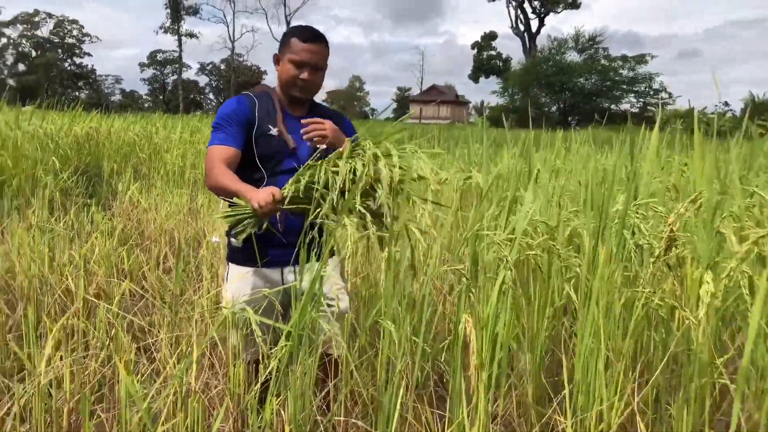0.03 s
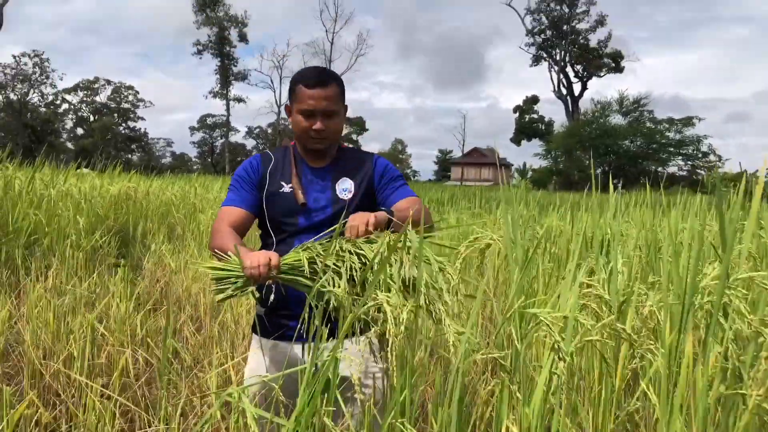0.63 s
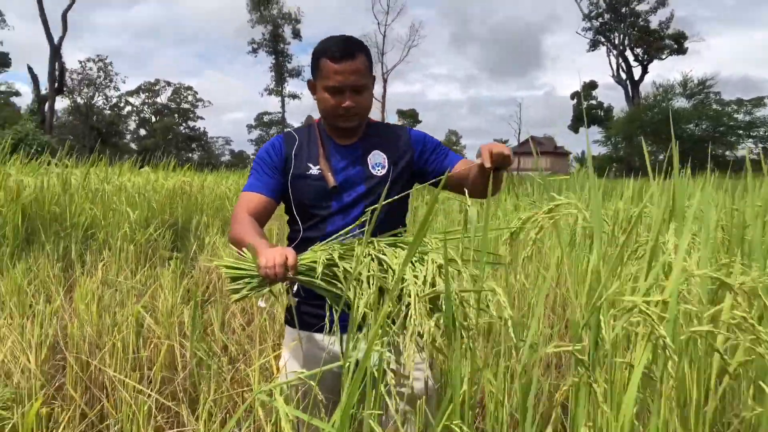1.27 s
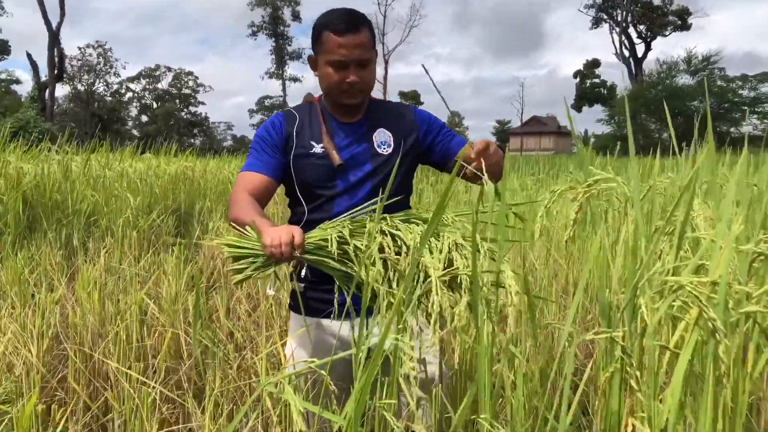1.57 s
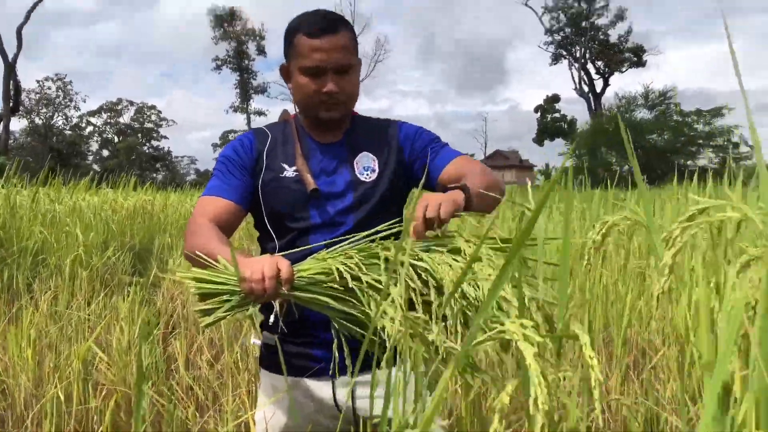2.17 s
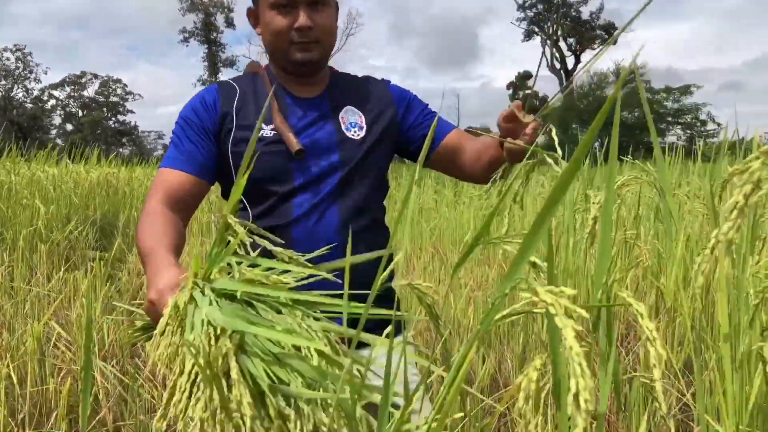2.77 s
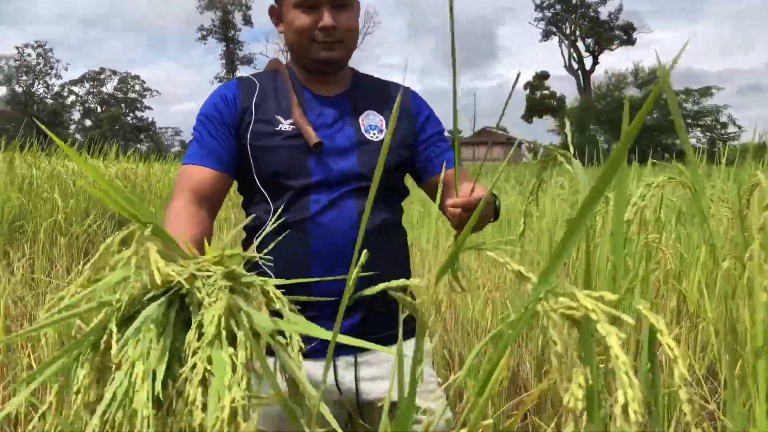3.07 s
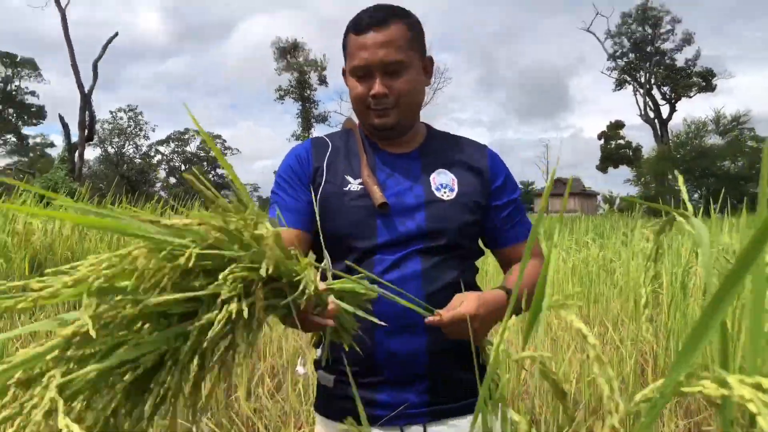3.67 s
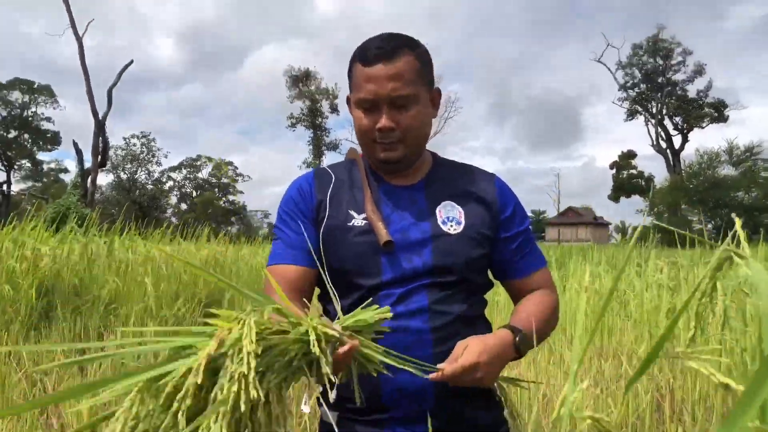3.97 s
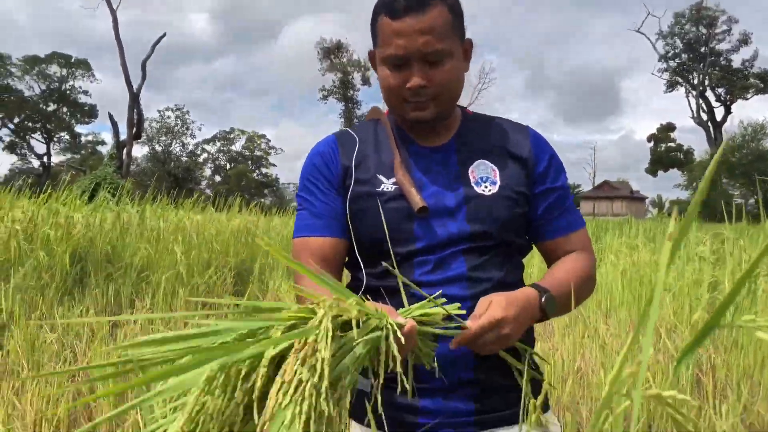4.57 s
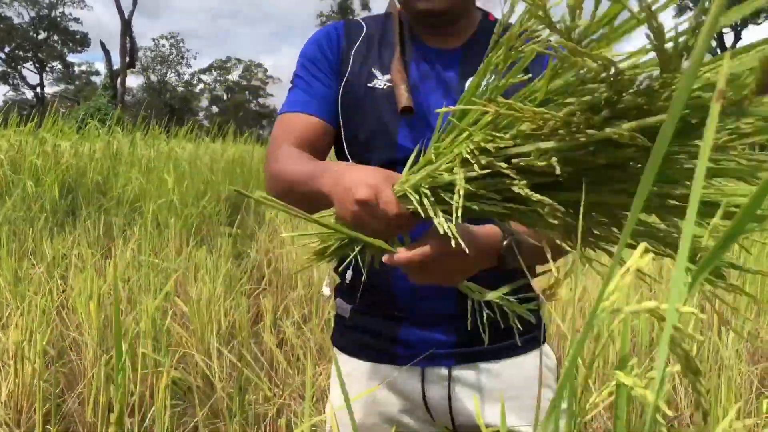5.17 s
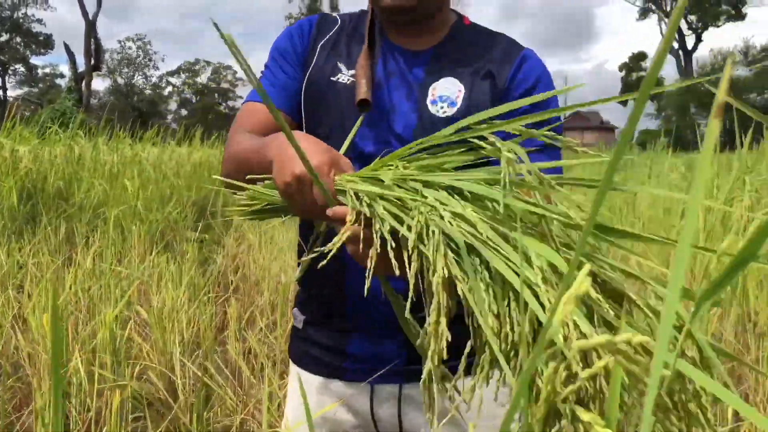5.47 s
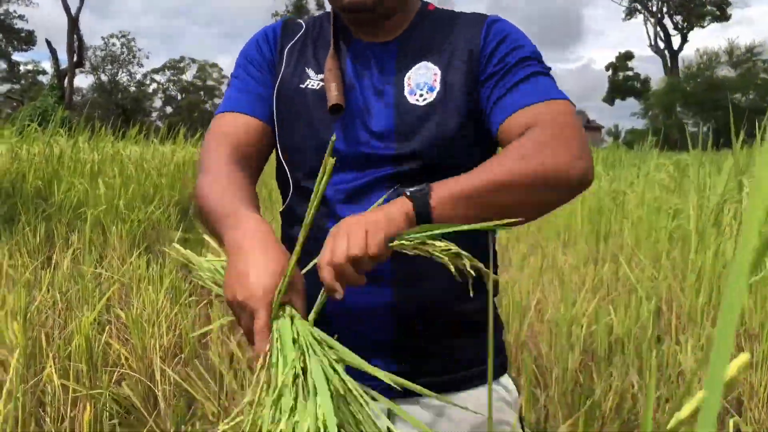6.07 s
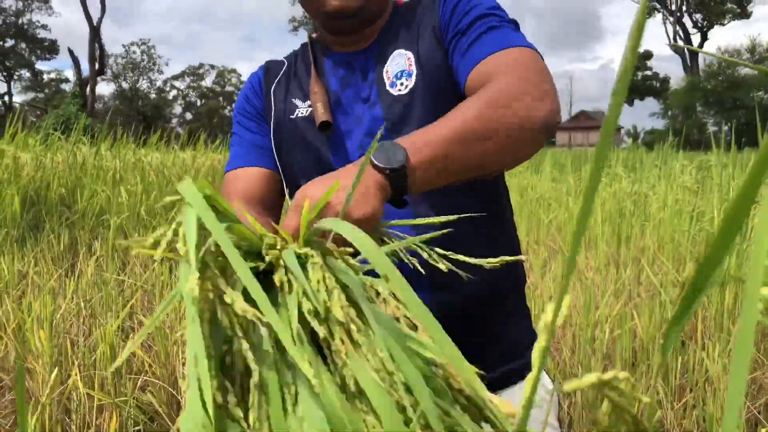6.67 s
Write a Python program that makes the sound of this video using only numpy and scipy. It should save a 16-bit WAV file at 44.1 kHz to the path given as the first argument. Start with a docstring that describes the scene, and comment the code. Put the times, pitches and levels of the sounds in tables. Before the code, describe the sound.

A bundle of rice stalks rustles and crackles in someone's hands, with soft muddy steps and a distant diesel engine thudding.

```python
"""A bundle of ripe rice rustles in someone's hands in an open paddy, a step or two from one microphone.
At first slow steps squelch in the mud, while far off a one-cylinder diesel thuds over faint field air.
From about 2 s the engine slows; dry blades slide, seed heads shake and hiss, and a few stems tick.
The squelching ends before 4 s, and by 5 s the engine is idling.
Then the bundle is turned more briskly, the engine picks up again, and one last step lands."""
import sys
import numpy as np
from scipy import signal
from scipy.fft import rfft, irfft
from scipy.io import wavfile
from scipy.ndimage import uniform_filter1d

SR = 44100
rng = np.random.default_rng(int(sys.argv[2]) if len(sys.argv) > 2 else 0)


def unload_wav(signal):
    """Save mono or channel-first audio to the path in sys.argv[1] as 16-bit WAV at rate SR, clipped to [-1, 1]."""
    wavfile.write(
        sys.argv[1],
        SR,
        np.round(np.clip(np.atleast_2d(signal).T, -1, 1) * 32767).astype(np.int16),
    )


N = 304731
TIME = np.arange(N) / SR
TOP_HZ = 15950  # the treble is cut off above this


# How briskly the bundle is turned, as the loudness of its blades: t/s, level/dB
TURNING = [(0, -66.5), (.42, -70.5), (.8, -69), (1.2, -65), (1.36, -69), (2.08, -67.5), (2.5, -63),
           (2.75, -60.5), (3.5, -60.5), (4.18, -63), (4.26, -68.5), (4.37, -65.5), (4.71, -68), (4.75, -64),
           (4.93, -60.5), (5.01, -64), (5.11, -58.5), (5.24, -53), (5.61, -56), (5.67, -58), (5.76, -55),
           (6.3, -53), (6.46, -56.5), (6.58, -51), (6.9, -54)]
# Single strokes and shakes: t/s, length/s, blade level/dB, extra for the seed heads/dB
STROKES = [(0.497, 0.11, -62.5, 7), (0.866, 0.16, -71.5, 15.5), (1.215, 0.08, -68, -4),
           (1.525, 0.21, -63.5, 9), (1.885, 0.18, -71.5, 13), (2.123, 0.17, -61.5, 5),
           (2.255, 0.087, -58, 7), (2.313, 0.11, -71, 14), (3.24, 0.27, -67, 11.5),
           (3.52, 0.46, -74.5, 14.5), (4.05, 0.09, -66, 6), (4.422, 0.067, -76, 20.5), (4.5, 0.28, -78, 15),
           (4.72, 0.048, -72, 14), (4.885, 0.16, -68, 10), (5.186, .17, -59.5, 10), (5.467, 0.09, -62, 4),
           (5.562, 0.08, -53.5, 5), (5.777, 0.075, -54, -10), (5.957, 0.25, -57.5, 11),
           (6.344, 0.065, -61, 11), (6.533, 0.56, -52.5, 8), (6.66, 0.4, -55, -1)]
def handling(husk_extra_db=5.5):
    """Starting levels in dB for blades and seed heads: strokes swell and fade on top of the turning."""
    blade_power = undb(curves(TURNING)[0]) ** 2
    husk_power = blade_power * undb(husk_extra_db) ** 2
    for s, length_s, db, extra_db in STROKES:
        progress = np.clip((TIME - s) / length_s, 0, 1)
        stroke = undb(db) * abs(np.sin(np.pi * progress)) ** .7
        blade_power += stroke ** 2
        husk_power += (stroke * undb(extra_db)) ** 2
    return 10 * np.log10(blade_power), 10 * np.log10(husk_power)


# The tone of thick stalks rubbing inside the bundle: f/Hz, level/dB
STALK_TONE = [(250, -22), (550, -1.5), (1000, -3.5), (1600, -4), (2400, -6.5), (4500, -6.5), (9000, -41)]
# The tone of dry blades sliding: f/Hz, level/dB
BLADE_TONE = [(300, -18), (600, -28.5), (1100, -7), (2200, -3.5), (3600, -2), (5500, -3), (8000, -4.5),
              (11000, -7.5), (16000, -19.5)]
# The high hiss of husks in the seed heads: f/Hz, level/dB
HUSK_TONE = [(5000, -20.5), (8500, -8.5), (10500, -3), (12500, 1.5), (14500, 5.5), (15600, 9), (16500, -30)]
def rustle(stalk_gain_db=-10.5, husk_gain_db=-1):
    """Rough blades and stalks catch and slip, hard husks tap together; brisker hands make more taps."""
    blade_db, husk_db = handling()
    briskness = undb(blade_db - blade_db.max())
    slips = undb(.5 * wander(80))
    stalks = colour(contacts(1500 + 5000 * briskness, spread_db=3), STALK_TONE)
    blade_taps = contacts(4000 + 14000 * briskness, spread_db=1.5)
    blades = colour(shimmer(blade_taps, depth_db=2.5, per_s=40, bands=36), BLADE_TONE)
    husk_taps = contacts(6000 + 14000 * briskness, spread_db=2)
    husks = colour(shimmer(husk_taps, depth_db=1, per_s=96, bands=14), HUSK_TONE)
    leaves = (unit(blades) + unit(stalks) * undb(stalk_gain_db)) * undb(blade_db)
    return slips * leaves + unit(husks) * undb(husk_db + husk_gain_db + wander(90))


def crinkle(centre_hz=3400, octaves=.58, spread_db=3, gain_db=-12, count=1800):
    """Single blades flick free and ring for a moment, each at its own pitch."""
    out = np.zeros(N)
    for s, (pitch, size) in zip(rng.uniform(0, N / SR, count), scatter(count, 2)):
        hz = centre_hz * 2 ** (octaves * pitch)
        add(out, s, undb(spread_db * size) * np.sqrt(hz) * ping(hz, cycles=20, glide=0))
    blade_db, _ = handling()
    return unit(out) * undb(blade_db + gain_db)


# Single leaves dragged over the stems: t/s, length/s, level/dB, start f/Hz, end f/Hz
SCRAPES = [(1.246, 0.016, -65, 5400, 5700), (1.486, 0.026, -58, 3400, 3690), (1.58, 0.023, -60, 3130, 2800),
           (3.063, 0.03, -66, 3900, 3600), (5.225, .11, -65, 1300, 1100), (5.429, 0.12, -59, 4280, 4710),
           (5.565, 0.054, -62, 4500, 4210), (6.342, 0.028, -55.5, 5270, 5830),
           (6.354, .055, -56.5, 3500, 3200), (6.791, 0.048, -60, 1193, 1393)]
def leaf_scrapes(slips_per_s=2500, sharpness=2.1):
    """A toothed leaf edge slips over a stem and rings; its pitch moves as its free length changes."""
    out, t = np.zeros(N), TIME[:SR // 3]
    for s, length_s, db, start_hz, end_hz in SCRAPES:
        slips = (rng.random(SR) < slips_per_s / SR) * rng.standard_normal(SR)
        width_hz = start_hz / sharpness
        ring = resonate(resonate(slips, start_hz, width_hz), start_hz, width_hz)
        speed = np.interp(t, [0, length_s], [1, end_hz / start_hz])  # faster sounds higher
        scrape = unit(np.interp(np.cumsum(speed), np.arange(SR), ring))
        add(out, s, scrape * swell(t, length_s, attack_s=.0056, release_s=.013) * undb(db))
    return out


# Stems that crack as they kink, and hard husks that tick high in the treble: t/s, peak level/dB, f/Hz
CRACKS_AND_TICKS = [(.248, -49, 2200), (.495, -52, 1800), (1.013, -51, 2600), (1.178, -48.5, 1700),
                    (1.502, -46, 3500), (1.546, -46.5, 2400), (1.598, -44, 2700), (1.678, -46, 4000),
                    (1.936, -46, 7000), (2.748, -48, 2500), (2.795, -48, 2500), (2.89, -45, 2540),
                    (3.037, -43, 2100), (3.074, -43, 2830), (3.092, -44.5, 3200), (3.175, -46, 2400),
                    (3.196, -46, 2000), (3.326, -43, 2600), (3.384, -45.5, 2100), (3.392, -41, 1700),
                    (3.394, -43.5, 3700), (4.6349, -38, 14800), (4.7995, -36, 14500), (5.9284, -37, 13000),
                    (6.037, -37, 9000), (6.104, -36, 11000), (6.3579, -38, 5500), (6.441, -39, 8000),
                    (6.5645, -33, 12000), (6.7166, -26.5, 8000), (6.7645, -31, 12000), (6.836, -34, 8000)]
def cracks_and_ticks(decay_s=.0006):
    """A kinking stem gives one short, fairly low crack; a husk gives a tick high in the treble."""
    out, t = np.zeros(N), TIME[:512]
    for s, db, hz in CRACKS_AND_TICKS:
        width_hz = min(hz / 1.4, 6000)
        crack = resonate(resonate(burst(t, decay_s), hz, width_hz), hz, width_hz)
        add(out, s, at_peak(crack, db))
    return out


# Feet settling on soft ground: t/s, peak level/dB
FOOTFALLS = [(1.197, -57), (1.669, -59), (3.401, -47), (6.795, -52)]
def footfalls(decay_s=.0061):
    """A foot sinking in gives a short, dull thump."""
    out, t = np.zeros(N), TIME[:4096]
    ground = knock([(100, -41), (200, -.5), (290, 18), (450, -10), (800, -8.5), (2000, -29)])
    for s, db in FOOTFALLS:
        thump = signal.fftconvolve(burst(t, decay_s), ground)
        add(out, s, at_peak(thump, db))
    return out


# The biggest air pockets in the mud: t/s, level before gain/dB, f/Hz, ring time/cycles
AIR_POCKETS = [(.246, -51, 2580, 4), (.427, -55, 350, 1), (.615, -51.5, 480, 1.2), (.968, -54, 1360, 3),
               (1.093, -52.5, 700, 2.2), (1.105, -45.5, 428, 9.4), (1.161, -41.5, 473, 3),
               (1.193, -42.5, 370, 2.8), (1.208, -46, 590, 2.5), (1.227, -45.5, 1010, 4.5),
               (1.251, -46, 1700, 5.5), (1.271, -43, 1170, 3), (1.308, -44, 784, 2.3),
               (1.335, -44.5, 3020, 7), (1.349, -41, 1120, 4.7), (1.388, -49, 960, 2.8),
               (1.399, -45, 1190, 2.4), (1.539, -51, 1460, 2.8), (1.619, -48.5, 1570, 3),
               (1.663, -49, 494, 2), (1.671, -50.5, 530, 1.4), (1.701, -56, 1630, 2.7),
               (1.748, -50, 1610, 1.6), (2.661, -52.5, 567, 2.7), (3.071, -54, 995, 3.3),
               (3.118, -47, 2400, 4), (3.126, -52, 1350, 4), (3.28, -51.5, 930, 4.8),
               (3.343, -49.5, 1620, 8), (3.36, -54, 1150, 4), (3.393, -51.5, 680, 2.2),
               (3.402, -48, 373, 1.2), (3.415, -43, 2830, 4.2), (3.459, -54.5, 904, 9.8),
               (3.492, -54.5, 850, 6), (3.538, -43.5, 860, 0.93)]
def mud_pops(splat_gain_db=-5.5, ring_gain_db=-1, ring_delay_s=.001116):
    """Each air pocket bursts with a wet splat and rings briefly."""
    out, t = np.zeros(N), TIME[:2048]
    for s, db, hz, cycles in AIR_POCKETS:
        splat = resonate(burst(t, decay_s=6.3 * cycles / hz), 1.15 * hz, width_hz=.75 * hz)
        add(out, s, at_peak(splat, db + splat_gain_db))
        add(out, s + ring_delay_s, undb(db + ring_gain_db) * ping(hz, cycles, glide=.0079))
    return out


# Mud sucking at a foot: t/s, length/s, level before gain/dB, start f/Hz, end f/Hz, spread/octaves
SQUELCHES = [(0.243, 0.031, -68.5, 1500, 1300, 0.18), (0.489, 0.08, -63, 570, 670, 0.12),
             (0.504, 0.054, -67, 1700, 1350, 0.26), (1, 0.16, -64, 850, 470, 0.47),
             (1.147, 0.11, -59.5, 496, 704, 0.35), (1.192, 0.046, -56, 1010, 1330, 0.45),
             (1.299, 0.2, -63, 1160, 1520, 0.65), (1.49, 0.17, -64, 2000, 1700, 0.58),
             (1.653, 0.16, -71, 1310, 1120, 0.61), (3.043, 0.056, -64, 1580, 1640, 0.62),
             (3.248, 0.14, -65.5, 1820, 1430, 0.6), (3.445, 0.16, -72, 850, 880, 0.53)]
def mud_suction(bubbles_per_s=700, spread_db=3, gain_db=.5):
    """A crowd of small bubbles around the foot slides in pitch as it sinks or pulls free."""
    out, t = np.zeros(N), TIME[:SR // 2]
    for s, length_s, db, start_hz, end_hz, octaves in SQUELCHES:
        crowd = np.zeros(SR)
        for k, (late, pitch, size, sign) in enumerate(scatter(bubbles_per_s // 2, 4)):
            when = (k + late + 2) / bubbles_per_s
            hz = np.interp(when, [0, length_s], [start_hz, end_hz]) * 2 ** (octaves * pitch)
            strength = np.sign(sign) * undb(spread_db * size) * np.sqrt(hz)
            add(crowd, when, strength * ping(hz, cycles=3.3, glide=.027))
        fade = swell(t, length_s, attack_s=.017, release_s=.026)
        add(out, s, unit(crowd[:len(t)]) * fade * undb(db + gain_db))
    return out


# How often the engine fires: t/s, f/Hz
ENGINE_SPEED = [(0.0, 28.77), (1.7, 28.79), (2.0, 26.46), (2.5, 27.33), (3.0, 25.93), (3.6, 24.25),
                (4.2, 21.8), (5.0, 19.5), (5.45, 18.44), (5.8, 19.61), (6.3, 22.18), (6.91, 26.28)]
# How much of each thud carries across the field: t/s, fullness/0-1
CARRY = [(0, 0.56), (.55, 0.98), (.85, 0.92), (1.2, 0.08), (1.83, 0.04), (2.0, 1), (3.0, 1), (5.9, 0.77),
         (6.91, 0.36)]
# The tone of a full thud at top speed: f/Hz, level/dB
FULL_THUD = [(28, -32.5), (45, -37.5), (58, -2), (86, -15.5), (115, 5), (144, 1.5), (172, 0), (200, -10.5),
             (230, -19.5), (290, -11.5), (350, -21), (500, -34), (900, -57.5)]
# The same thud thinned to mostly the pipe's note: f/Hz, level/dB
THIN_THUD = [(28, -32), (58, -12), (86, -28), (115, -11.5), (144, -3), (172, 2), (200, -6.5), (230, -28),
             (280, -13.5), (380, -29.5), (900, -51.5)]
# The boom of the slowing engine, before its pitch is lowered: f/Hz, level/dB
SLOWING_BOOM = [(30, -30), (50, -38), (76, 23), (100, 9), (140, 8), (400, -44)]
# The tone of the low rush of exhaust gas: f/Hz, level/dB
GAS_RUSH_TONE = [(120, -54), (210, -3.5), (290, -2), (380, -10), (600, -20.5), (1500, -25), (5000, -68)]
def diesel(jitter_s=.0014, spread_db=4, cooling=.52, boom_db=-6.5, gas_rush_db=-12, gain_db=-3):
    """Each firing thuds in the exhaust pipe; distance leaves the bass, at times only the pipe's note."""
    rate, = curves(ENGINE_SPEED)
    fullness, = curves(CARRY)
    level_db, uneven = engine_state()
    full, thin, boom = knock(FULL_THUD), knock(THIN_THUD), knock(SLOWING_BOOM)
    cycles = np.cumsum(rate) / SR
    firings = np.flatnonzero(np.diff(np.floor(cycles), prepend=-1))
    slowing = uniform_filter1d(1. * (np.gradient(rate) < 0), SR)
    thuds, age = np.zeros(N), np.arange(len(full))
    for i, (late, size) in zip(firings, scatter(256, 2)):
        thud = thin + fullness[i] * (full - thin)
        # off the throttle the firings boom and stumble
        thud += undb(boom_db) * slowing[i] * np.sqrt(uneven[i]) * boom
        when = i / SR + jitter_s * uneven[i] * late
        # cooler gas at low speed makes the pipe ring lower
        thud = np.interp(age * (rate[i] / rate.max()) ** cooling, age, thud)
        add(thuds, when, undb(spread_db * uneven[i] * size) * thud)
    # a nearly steady low rush of exhaust gas when the engine works hard
    gas_rush = unit(colour(rng.standard_normal(N), GAS_RUSH_TONE) * np.exp(-(cycles % 1) / 4.5))
    effort = np.clip(1 - 2 * uneven, 0, 1)
    exhaust = thuds * np.sqrt(SR / rate) + gas_rush * effort * fullness * undb(gas_rush_db)
    return exhaust * undb(level_db + gain_db)


# The throttle, which sets how hard the engine works: t/s, opening/0-1
THROTTLE = [(0, 1), (1.72, 0.71), (2.0, 0.54), (2.11, 0.45), (2.16, 0.65), (2.28, 0.8), (2.35, 0.4),
            (2.42, 0.66), (2.52, 0.66), (2.6, 0.53), (3.0, 0.47), (3.55, 0.59), (3.95, 0.32), (4.5, 0.06),
            (5.0, 0.08), (5.45, 0.24), (5.95, 0.81), (6.91, 1)]
def engine_state(open_db=-49.5, shut_db=-69.5, db_per_octave=9, stumble=.59):
    """Starting level in dB and unevenness: a closing throttle makes the firings weak and ragged."""
    shut = 1 - np.clip(curves(THROTTLE)[0], 0, 1)
    rate, = curves(ENGINE_SPEED)
    throttle_db = open_db + (shut_db - open_db) * shut ** 1.7
    speed_db = db_per_octave * np.log2(rate / rate.max())  # slower firings are weaker too
    return throttle_db + speed_db, stumble * shut


# The tone of the engine's echo: f/Hz, level/dB
ECHO_TONE = [(35, -18), (55, -28), (80, -4), (120, -18), (165, -6), (230, -36), (600, -61)]
def far_rumble(gain_db=-14.5):
    """The tree line sends the diesel back as a blurred rumble that stands out more when it stumbles."""
    level_db, uneven = engine_state()
    rumble = unit(colour(rng.standard_normal(N), ECHO_TONE))
    return rumble * (.5 + 2 * uneven) * undb(level_db + gain_db)


# The tone of the open air: f/Hz, level/dB
AIR_TONE = [(22, 5), (38, -24), (55, 1), (90, 2.5), (165, 2), (215, -6.5), (400, -11.5), (700, -18),
            (1300, -16.5), (2500, -24), (6000, -28), (16000, -71)]
def field_air(level_db=-61):
    """A soft, almost steady wash from far across the field."""
    return unit(colour(rng.standard_normal(N), AIR_TONE)) * undb(level_db + .13 * wander(1))


def contacts(per_s, spread_db):
    """Tiny taps at random moments, most of them weak; equally strong overall at any rate."""
    chance = np.clip(per_s / SR, 1e-4, 1)
    size = undb(spread_db * np.minimum(rng.exponential(size=N), 5))
    hits = rng.random(N) < chance
    return unit(hits * size * rng.choice([-1, 1], N) / np.sqrt(chance))


def shimmer(x, depth_db, per_s, bands):
    """Each touching blade rings in its own pitch range, so each range swells and fades on its own."""
    spectrum = rfft(x)
    place = np.sqrt(np.minimum(np.fft.rfftfreq(N, 1 / SR) / TOP_HZ, 1)) * (bands - 1)
    slices = (irfft(spectrum * np.maximum(1 - abs(place - k), 0), N) for k in range(bands))
    return sum(band * undb(depth_db * wander(per_s)) for band in slices)


def ping(hz, cycles, glide):
    """A short, fading ring; with a glide its pitch rises like a bubble's."""
    turns = np.arange(int(5 * cycles * SR / hz)) * hz / SR
    fade = (1 - np.exp(-2 * turns)) * np.exp(-turns / cycles)
    return fade / fade.max() * np.sin(2 * np.pi * turns * (1 + glide * turns / cycles))


def knock(tone, size=4096):
    """The ring of one blow, with its tone given as rows of f/Hz, level/dB."""
    cepstrum = irfft(np.log(tone_gains(tone, size)))
    # keeping only the first half packs the sound toward its start (minimum phase)
    ring = irfft(np.exp(rfft(2 * cepstrum * (np.arange(size) < size // 2))))
    return ring / np.linalg.norm(ring)


def tone_gains(tone, size):
    """Join rows of f/Hz, level/dB into a gain for every frequency."""
    hz, db = np.transpose(tone)
    f = np.fft.rfftfreq(size, 1 / SR)
    return undb(np.interp(np.log(f + 1), np.log(hz), db))


def colour(x, tone):
    """Give a sound the tone in a table."""
    return irfft(rfft(x) * tone_gains(tone, len(x)), len(x))


def resonate(x, hz, width_hz):
    """Make a sound ring around one pitch."""
    return signal.lfilter(*signal.iirpeak(min(hz, .45 * SR), hz / width_hz, SR), x)


def burst(t, decay_s):
    """Noise that starts at once and dies away."""
    return rng.standard_normal(len(t)) * np.exp(-t / decay_s)


def swell(t, length_s, attack_s, release_s):
    """Rise, hold until length_s, then die away."""
    return np.clip(t / attack_s, 0, 1) * np.exp(-np.maximum(t - length_s, 0) / release_s)


def wander(per_s):
    """A random drift, about 1 in size, that changes course per_s times a second."""
    points = rng.standard_normal(4096)
    return unit(np.interp(TIME * per_s, np.arange(len(points)), points))


def scatter(rows, columns):
    """Random numbers around 0, kept between -2 and 2."""
    return np.clip(rng.standard_normal((rows, columns)), -2, 2)


def curves(table):
    """Join a table's timed rows into one curve for each column after the time."""
    s, *columns = np.transpose(table)
    return [np.interp(TIME, s, column) for column in columns]


def add(out, s, sound):
    """Mix a short sound in at s seconds."""
    i = int(np.clip(s * SR, 0, N - 1))
    out[i:i + len(sound)] += sound[:N - i]


def undb(db):
    """Turn decibels into a number to multiply by."""
    return 10 ** (np.asarray(db) / 20)


def unit(x):
    """Scale to an average strength (rms) of 1."""
    return x / np.sqrt(np.mean(x ** 2))


def at_peak(x, db):
    """Scale so the highest peak is at db."""
    return undb(db) * x / abs(x).max()


def scene():
    """Rice, steps, engine and air all reach one microphone in the open."""
    rice = rustle() + crinkle() + leaf_scrapes() + cracks_and_ticks()
    steps = footfalls() + mud_pops() + mud_suction()
    mono = rice + steps + diesel() + far_rumble() + field_air()
    return np.array([mono, mono])


def record(dry):
    """The recorder drops the deepest bass and cuts the highest treble steeply."""
    thinned = signal.sosfilt(signal.butter(5, 33, "high", fs=SR, output="sos"), dry)
    return signal.sosfilt(signal.ellip(12, .1, 70, TOP_HZ, fs=SR, output="sos"), thinned)


dry = scene()
out = record(dry)
unload_wav(out)
```